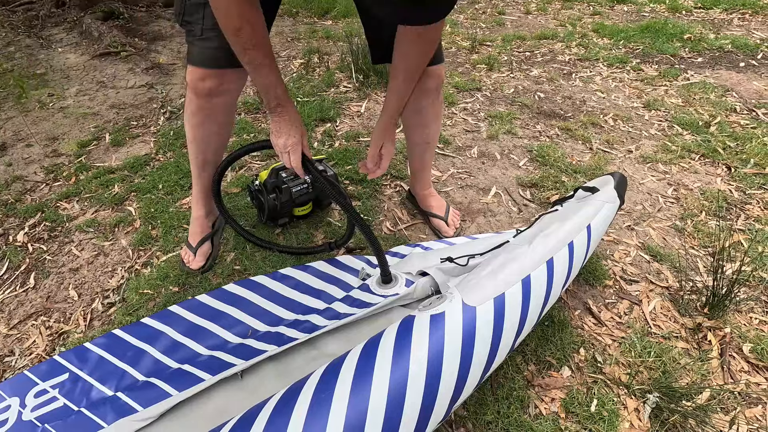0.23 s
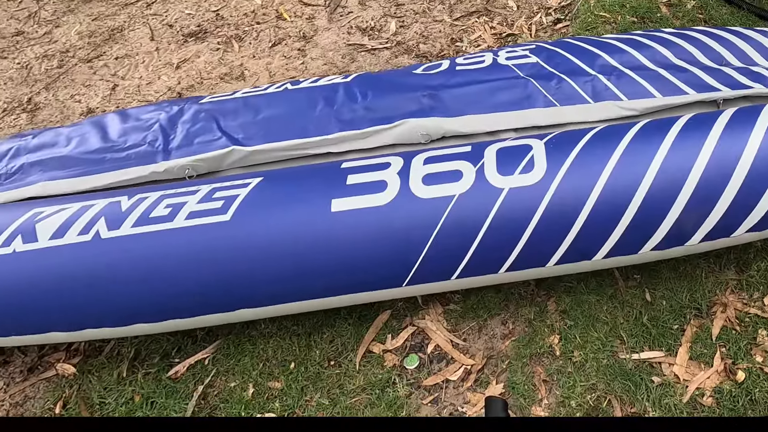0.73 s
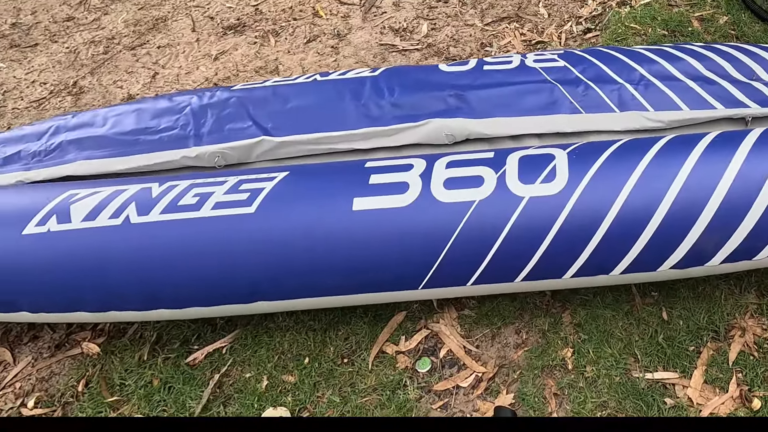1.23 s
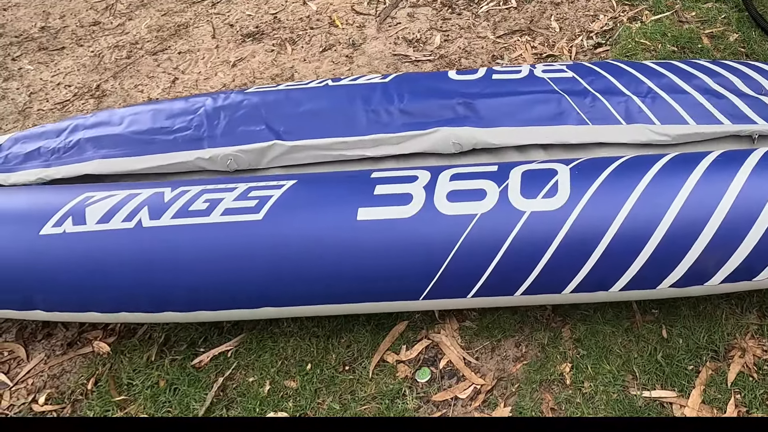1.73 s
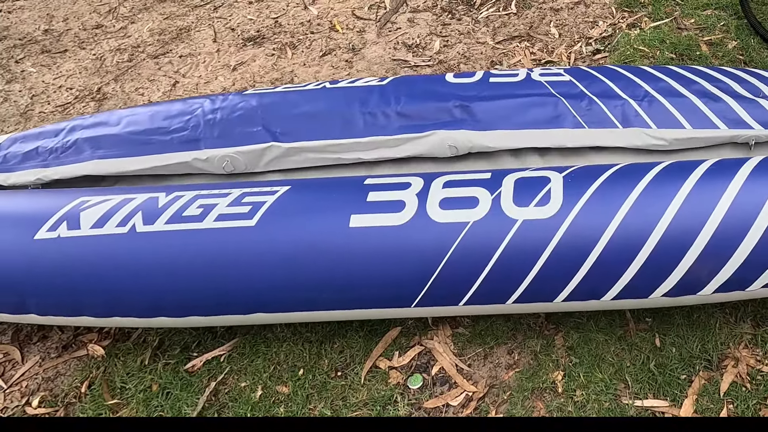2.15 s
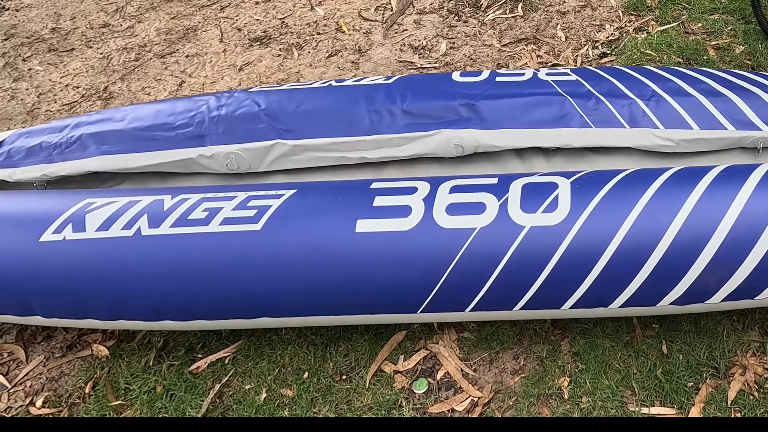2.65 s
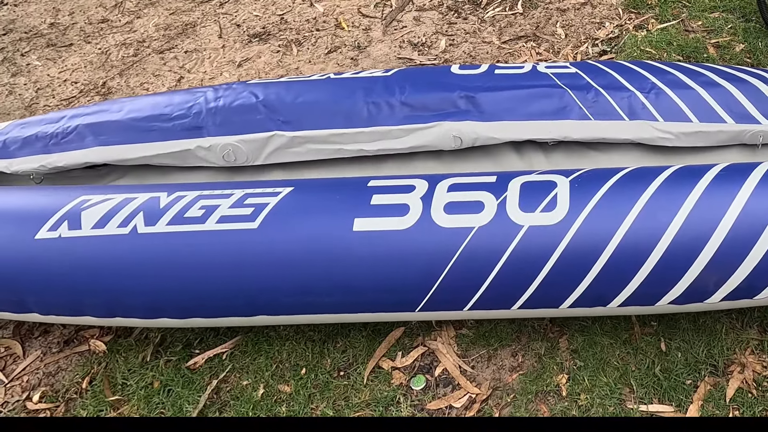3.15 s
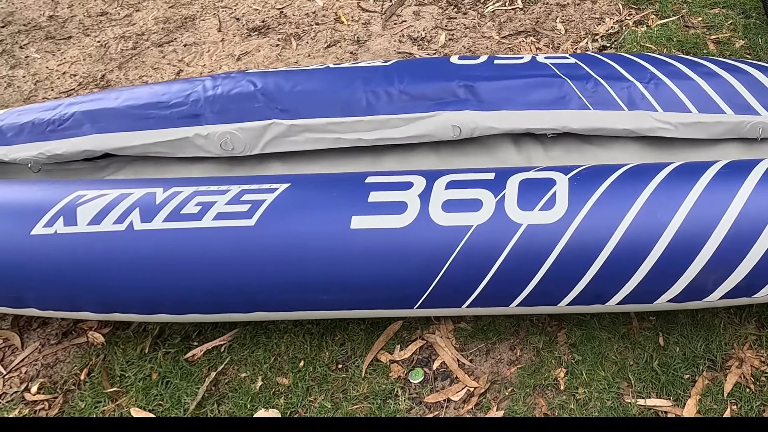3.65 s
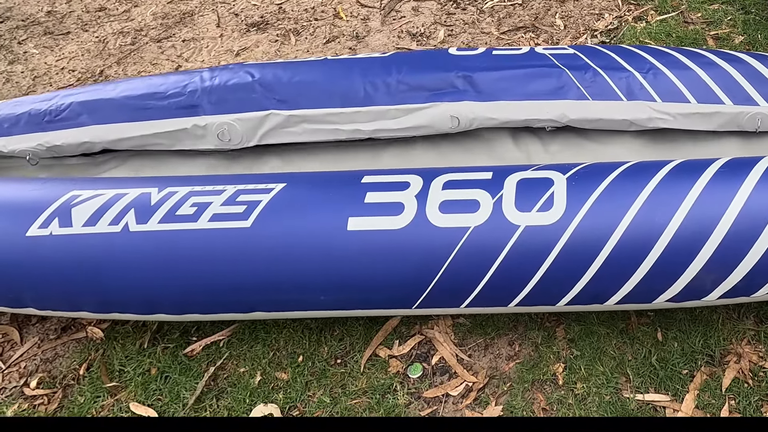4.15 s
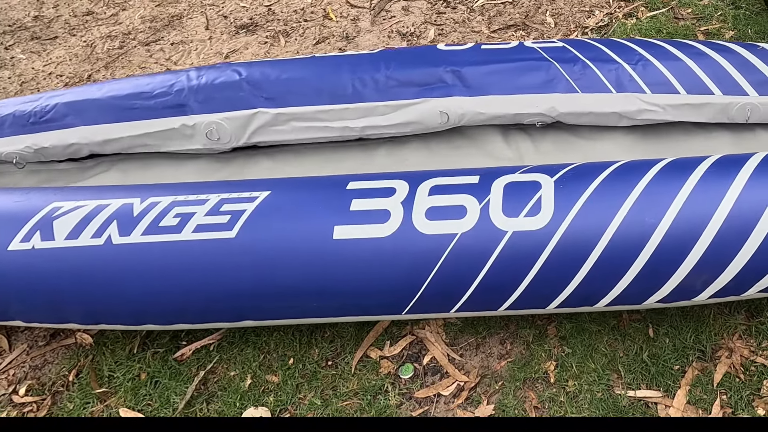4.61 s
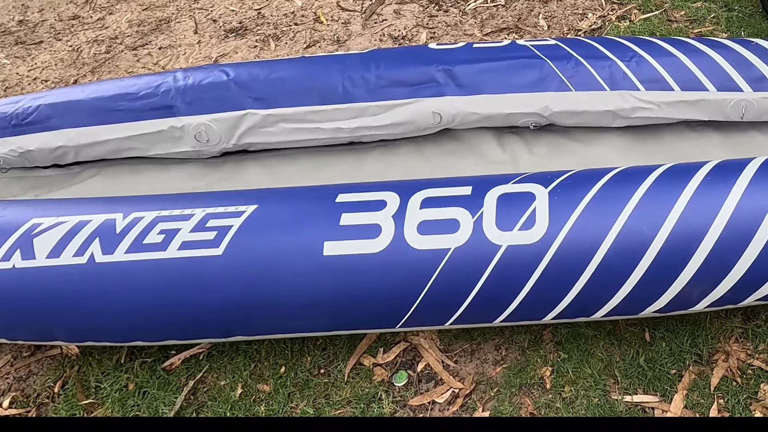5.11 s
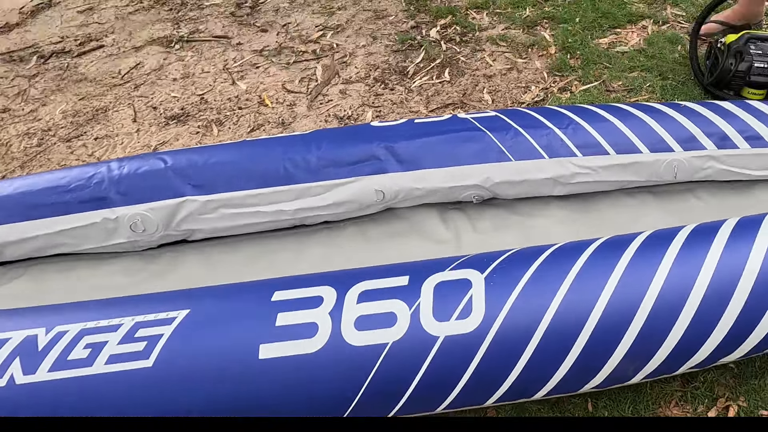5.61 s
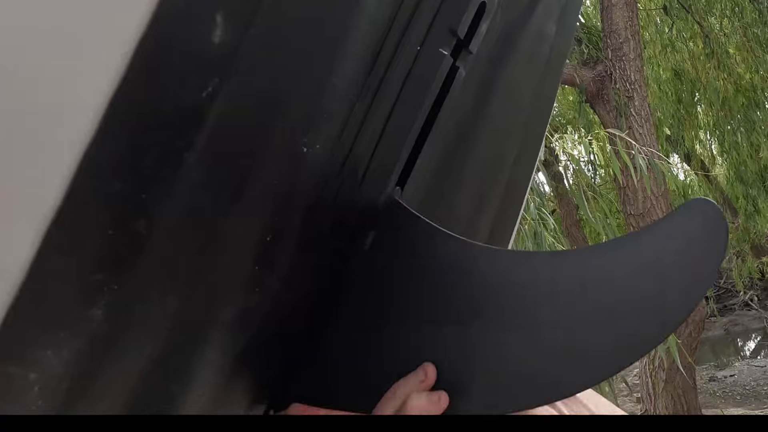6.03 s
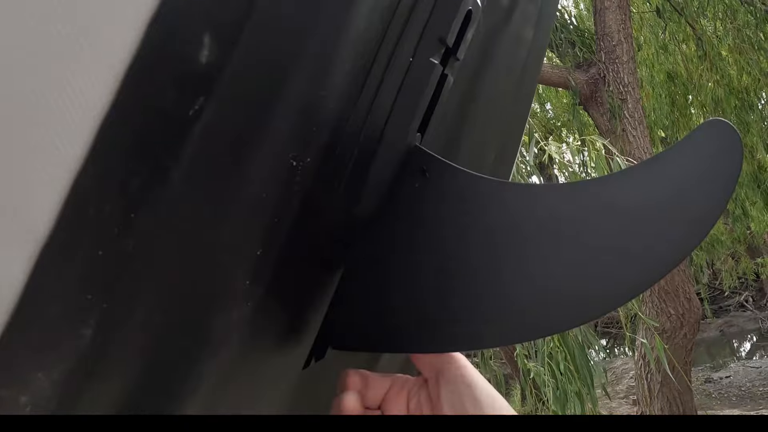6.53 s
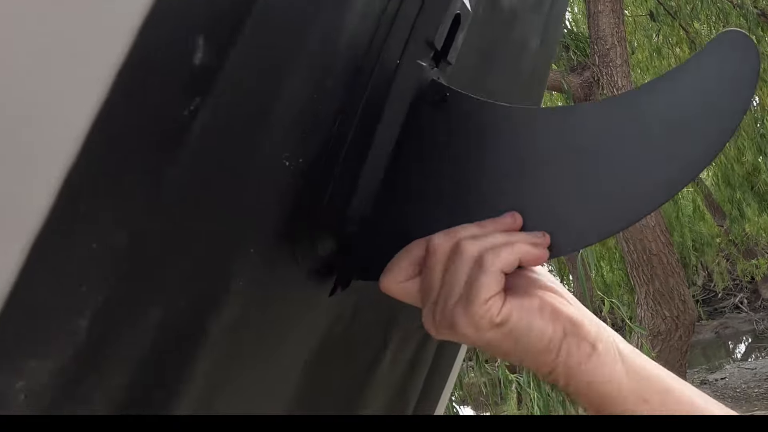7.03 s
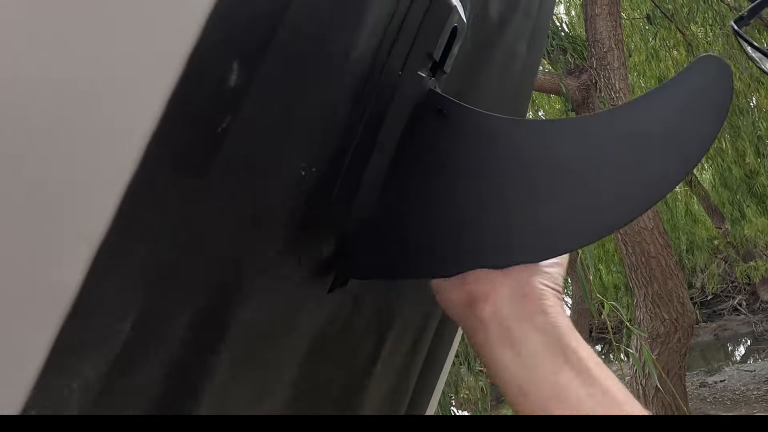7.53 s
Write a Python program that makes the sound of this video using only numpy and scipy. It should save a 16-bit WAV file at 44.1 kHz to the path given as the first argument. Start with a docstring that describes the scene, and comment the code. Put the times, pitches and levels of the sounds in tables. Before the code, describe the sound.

Close outdoor microphone: faint leafy breeze, a short complete silence, then about five seconds of a constant, loud electric inflator, its mid-low drone joined by a thin whine and blowing air, with low wind thuds. After an abrupt cut, irregular dry plastic clacks, short gritty scrapes and hand rubbing come close by, with the air-filled hull booming softly over quiet leaves and faint distant birds.

```python
"""Light wind and rustling leaves on a lawn are heard for a moment, then dead silence.
A cordless electric pump starts and stops abruptly, blowing up an inflatable boat: locked harmonics of one
loud hum, a whine at its own pitch and the filtered noise of rushing air; wind buffets the microphone.
Then a plastic fin is worked into its slot under the hull: struck modes click, stick-slip friction scrapes
and low pulses bump, while swells of low noise make the hull boom."""
import sys
import numpy as np
from scipy import signal
from scipy.fft import rfft, irfft
from scipy.io import wavfile
from scipy.ndimage import map_coordinates

SR = 44100
rng = np.random.default_rng(int(sys.argv[2]) if len(sys.argv) > 2 else 0)


def bounce(signal):
    """Save signal as a 16-bit WAV file at the path given by the first command-line argument."""
    frames = np.transpose(np.atleast_2d(signal))
    limited = np.clip(frames, -1, 1)
    pcm = np.round(limited * 32767).astype(np.int16)
    wavfile.write(sys.argv[1], SR, pcm)


N = 342585
TIME = np.arange(N) / SR
FREQS = np.maximum(np.arange(N // 2 + 1) * SR / N, 1)
LAWN_END_S, PUMP_START_S, PUMP_END_S = .257, .675, 5.696


def from_db(db):
    """Level law: decibels to amplitude gain."""
    return 10 ** (np.asarray(db) / 20)


def rms_one(x):
    """Normalisation: scale to unit mean power."""
    return x / np.sqrt(np.mean(x ** 2) + 1e-20)


def in_time(rows):
    """Linear interpolation: each column of a curve at every sample."""
    s, *columns = np.transpose(rows)
    return [np.interp(TIME, s, c) for c in columns]


def at_hz(rows, hz):
    """Logarithmic pitch scale: each column of a spectrum, interpolated on a log-frequency axis."""
    points, *columns = np.transpose(rows)
    return [np.interp(np.log(hz), np.log(points), c) for c in columns]


def drift(rate_hz):
    """Low-pass random process: slow chance variation with an rms of 1."""
    white = rfft(rng.standard_normal(N))
    return rms_one(irfft(white / (1 + (FREQS / rate_hz) ** 2), N))


def pan(balance_db):
    """Interaural level difference: left and right gains, positive towards the left."""
    return from_db(np.array([[.5], [-.5]]) * balance_db)


def between(start, end):
    """Gating: 1 from start to end in seconds, with millisecond edges."""
    return np.interp(TIME, [start - .001, start, end, end + .001], [0, 1, 1, 0])


def noise(level_db, alike, lag_ms=0):
    """Partial coherence: stereo noise of a given spectrum; a lag delays the left port."""
    alike = np.clip(alike, 0, 1)
    mid, side = rfft(rng.standard_normal((2, N)))
    pair = np.sqrt(1 + alike) * mid + np.sqrt(1 - alike) * side * np.array([[1], [-1]])
    pair[0] *= np.exp(-2j * np.pi * FREQS * lag_ms / 1000)
    return rms_one(irfft(pair * from_db(level_db) * (FREQS > 10), N))


def swells(rows, floor_db):
    """Addition of powers: a floor plus events that each grow and die away exponentially, in dB."""
    power = from_db(floor_db) ** 2
    for s, rise, fall, db in rows:
        envelope = np.exp(-np.abs(TIME - s) / np.where(TIME < s, rise, fall))
        power = power + (from_db(db) * envelope) ** 2
    return 10 * np.log10(power)


def thumps(rows):
    """Damped low swings: each is a cosine under a Gaussian envelope."""
    out = 0
    for s, db, hz, length in rows:
        envelope = np.exp(-.5 * ((TIME - s) / length) ** 2)
        out = out + from_db(db) * envelope * np.cos(2 * np.pi * hz * (TIME - s))
    return out


# Gusts on the microphone; from 6 s on, low booms of the hull stirred by the bumps.
# Each row: peak time in seconds, rise in seconds, fall in seconds, level in dB.
GUSTS_AND_BOOMS = [(.01, 0.01, 0.14, -30), (.97, 0.097, .13, -32), (1.73, 0.055, .04, -29),
                   (1.98, 0.075, 0.034, -16.5), (2.3, 0.35, .1, -22.5), (2.49, 0.018, 0.025, -17.5),
                   (2.9, 0.098, 0.072, -26.5), (4.3, .1, 0.14, -42), (4.77, 0.048, 0.073, -26.5),
                   (4.88, .03, 0.079, -25), (5.81, 0.069, 0.078, -26.5), (6.07, 0.05, 0.028, -21),
                   (6.19, 0.059, 0.058, -20), (6.34, 0.039, 0.086, -24), (6.6, 0.068, 0.13, -22.5),
                   (6.96, 0.1, 0.1, -19), (7.52, 0.013, 0.086, -26)]
# Spectrum of the low rumble. Each row: frequency in Hz, relative density in dB per Hz.
RUMBLE = [(12, -5.5), (25, 4), (55, -2.5), (90, -7.5), (160, -21.5), (260, -33), (450, -47), (1000, -79)]
# Spectrum added in strong swells (eddies in a gust). Each row: frequency in Hz, relative density in dB per Hz.
STRONG_SWELL = [(30, -3.5), (70, -1.5), (130, 2), (220, -6.5), (330, -20.5), (600, -23), (1500, -68.5)]
# Single buffets of wind, before the ports round them off.
# Each row: centre in seconds, peak in dB, frequency in Hz, Gaussian length in seconds.
BUFFETS = [(1.965, -18, 145, 0.014), (2.325, -23, 170, .006), (2.5, -25, 128, 0.0049),
           (5.27, -37, 194, 0.0073)]
# the breeze under the swells, and how much it wanders
BREEZE_DB, BREEZE_WANDER_DB = -44, 1


def wind_and_hull_boom(upper_db=-7.0, strong_db=-19.5, upper_growth=0.75):
    """Level-dependent spectrum: a lumpy rumble of wind, later of the hull; its upper part grows faster."""
    level_db = swells(GUSTS_AND_BOOMS, BREEZE_DB + BREEZE_WANDER_DB * drift(3))
    rumble = from_db(level_db) * noise(at_hz(RUMBLE, FREQS)[0], alike=0.93)
    upper_level_db = level_db + upper_db + upper_growth * (level_db - strong_db)
    upper = from_db(upper_level_db) * noise(at_hz(STRONG_SWELL, FREQS)[0], alike=1.0)
    # the ports round off the hardest swings
    return 0.31 * np.tanh((rumble + upper + thumps(BUFFETS)) / 0.24)


# Swells of rustling: leaves at the opening, then hands rubbing on hose and hull.
# Each row: peak time in seconds, rise in seconds, fall in seconds, level in dB before the flicker.
RUSTLES = [(.14, .06, 0.16, -50), (5.7, .01, 0.044, -39), (5.95, 0.065, 0.066, -40),
           (6.22, 0.13, .04, -42.5), (6.45, 0.19, 0.041, -46.5), (6.68, 0.055, 0.053, -42),
           (6.95, 0.12, .1, -47), (7.23, 0.19, 0.034, -41.5), (7.42, 0.023, .06, -47),
           (7.59, 0.084, 0.036, -38.5), (7.69, 0.017, 0.027, -37)]
# Spectrum of leaves and rubbing. Each row: frequency in Hz, relative density in dB per Hz.
LEAVES = [(150, 13), (350, 4), (650, -5), (1000, 3.5), (1450, 4.5), (2000, -0.5), (3100, -1.5), (4500, -5),
          (7500, -8.5), (8300, -15), (11000, -17.5), (15000, -43)]
LEAVES_DB = -52  # the steady rustle, before the flicker


def rustle(flicker_db=3.0):
    """Amplitude-modulated noise: a soft uneven bed of leaves, then hands rubbing swell out of it."""
    level_db = swells(RUSTLES, LEAVES_DB) + flicker_db * drift(30)
    return from_db(level_db) * noise(at_hz(LEAVES, FREQS)[0], alike=0.71)


# The pump's tones at the two microphone ports.
# Each row: frequency in Hz, left-right balance in dB, lead of the left port in radians.
PUMP_PLACE = [(377, -1.36, -.02), (1075, -5.5, -0.53), (1700, -2, -0.91), (2500, -3.5, -0.75),
              (2900, -8, -1.06), (3224, -6.5, -1.33), (5800, -5.5, -0.43), (8600, -8, 0.16),
              (11600, 4, 0.48)]


def tone(turns, hz, level_db):
    """Port level and phase difference: a sine of the given rms level, as it arrives from the pump."""
    balance_db, lead = at_hz(PUMP_PLACE, hz)
    phase = 2 * np.pi * (turns + rng.random()) + np.array([[.5], [-.5]]) * lead
    return np.sqrt(2) * from_db(level_db) * pan(balance_db) * np.sin(phase)


# the hum at switch-on, and how it sags as the boat fills
HUM_HZ, HUM_DB, SAG_DB_PER_S = 358.2, -12.5, 0.13
# slow wander and fast jitter of the motor's speed (shares of the pitch)
WANDER, JITTER = 0.000305, 0.00019
# Overtones locked to the hum. Each row: multiple of the hum, mean level in dB relative to the hum.
OVERTONES = [(2, -32.5), (3, -21), (4, -36), (5, -25.5), (6, -32), (7, -18), (8, -14.5), (9, -29.5),
             (10, -29.5), (11, -37), (12, -35), (14, -41), (15, -33), (16, -20.5), (17, -37), (18, -40),
             (19, -42), (20, -39), (21, -40.5), (22, -45), (24, -37), (25, -44), (26, -41.5), (27, -46),
             (28, -50), (29, -48), (30, -49.5), (31, -56), (32, -56), (33, -53), (34, -54), (35, -61),
             (36, -65), (37, -62), (38, -62), (39, -68), (40, -67), (41, -68)]
# Brief fades of single overtones as the microphone moves.
# Each row: middle in seconds, Gaussian half length in seconds, multiple of the hum, depth in dB.
FADES = [(0.815, 0.067, 3, -11), (1.02, 0.031, 24, -6), (1.06, 0.039, 16, -12), (4.417, .06, 16, -6),
         (4.464, 0.07, 3, -3), (4.84, 0.28, 16, -7.5), (4.985, 0.12, 3, -3)]
# the overtones swell and fade a little all the time
OVERTONE_SWELL_DB, OVERTONE_SWELLS_PER_S = 1.0, 0.5
# the whistling middle overtones sink as the boat fills
SINK_DB_PER_S, SINK_HZ, SINK_OCTAVES = 0.42, 2200, 0.32


def hum(turns, flutter_db=0.31):
    """Harmonic series: a steady fundamental with phase-locked overtones that swell and fade."""
    hum_db = HUM_DB - SAG_DB_PER_S * (TIME - PUMP_START_S)
    sink_db = SINK_DB_PER_S * (TIME - (PUMP_START_S + PUMP_END_S) / 2)
    out = tone(turns, HUM_HZ, hum_db + flutter_db * drift(25.8))
    for multiple, relative_db in OVERTONES:
        hz = multiple * HUM_HZ
        sinking = np.exp(-.5 * (np.log2(hz / SINK_HZ) / SINK_OCTAVES) ** 2)
        level_db = hum_db + relative_db - sinking * sink_db
        for s, length, which, db in FADES:
            if which == multiple:
                level_db = level_db + db * np.exp(-.5 * ((TIME - s) / length) ** 2)
        swell_db = OVERTONE_SWELL_DB * drift(OVERTONE_SWELLS_PER_S)
        out += tone(multiple * turns, hz, level_db + swell_db)
    return out


WHINE_HZ = 1702.3
# Level curve of the whine. Each row: time in seconds, rms level in dB.
WHINE = [(.7, -28.5), (1.2, -23.5), (2.8, -26.5), (3.5, -29.5), (4.15, -43), (4.45, -35), (4.95, -33),
         (5.67, -22.5)]
# Faint tones beside the whine. Each row: frequency in Hz, rms level in dB before the waver.
SIDE_TONES = [(871, -54), (920, -49.5), (2060.5, -48.5), (3404.6, -50)]


def whine(waver_db=4.0):
    """Inharmonic partials: a whine at a pitch of its own, with faint wavering tones beside it."""
    out = tone(WHINE_HZ * TIME, WHINE_HZ, in_time(WHINE)[0])
    for side_hz, level_db in SIDE_TONES:
        side_turns = side_hz * TIME + 0.018 * drift(8)
        out += tone(side_turns, side_hz, level_db + waver_db * drift(2.8))
    return out


# Spectrum of the rushing air. Each row: frequency in Hz, relative density in dB per Hz.
AIR = [(40, -19), (250, -3), (500, -2.5), (780, -7), (1000, 0.5), (1800, -6), (3500, -0.5), (5000, -4.5),
       (6500, -8), (7800, -12), (8100, -16), (10500, -20), (13000, -35.5), (15200, -51)]
# Resonances of hose and housing. Each row: centre in Hz, width in Hz, boost in dB.
HOSE = [(1090, 94, 3), (1520, 220, 6.5), (2020, 150, 8.5), (2440, 150, 2.5), (2972, 207, 10.5),
        (4300, 460, 2.5)]
AIR_DB = -28.5  # before chopping and echo
GROUND_ECHO_MS = 1.246  # extra path of the echo off the ground


def rushing_air(turns, chop=0.081, echo_db=-19):
    """Turbulence and resonance: coloured noise, chopped at the hum's rate, combed by the ground echo."""
    colour_db = at_hz(AIR, FREQS)[0]
    for hz, width, db in HOSE:
        colour_db = colour_db + db / (1 + (2 * (FREQS - hz) / width) ** 2)
    direct = noise(colour_db, alike=0.94, lag_ms=0.016)
    earlier = np.arange(N) - GROUND_ECHO_MS * SR / 1000
    echo = np.array([map_coordinates(side, [earlier]) for side in direct])
    chopping = 1 + chop * np.cos(2 * np.pi * turns)
    return from_db(AIR_DB) * chopping * pan(-2.0) * (direct + from_db(echo_db) * echo)


def pump():
    """Superposition: hum, whine and air, the hum and the chopping of the air sharing one rotation."""
    speed = 1 + WANDER * drift(0.91) + JITTER * drift(23)
    turns = np.cumsum(HUM_HZ * speed) / SR
    return hum(turns) + whine() + rushing_air(turns)


# Far bird calls. Each row: start in seconds, length in seconds, start and end pitch in Hz, level in dB.
BIRDS = [(6.8, .07, 2900, 2750, -56), (7.28, .045, 4300, 3300, -62)]


def distance(drone_hz=156.5, drone_db=-53):
    """Frequency modulation: a faint wavering drone and gliding, fluttering bird calls, all far away."""
    drone_turns = drone_hz * TIME + 0.095 * drift(2.7)
    out = np.sqrt(2) * from_db(drone_db + 2 * drift(4)) * np.sin(2 * np.pi * drone_turns)
    for s, length, start_hz, end_hz, db in BIRDS:
        along = np.clip((TIME - s) / length, 0, 1)
        pitch_hz = (start_hz + (end_hz - start_hz) * along) * (1 + .05 * drift(200))
        call = np.sin(np.pi * along) * np.sin(2 * np.pi * np.cumsum(pitch_hz) / SR)
        out += np.sqrt(2) * from_db(db) * call
    return out


# Contacts of the fin in its slot. Each row: time in seconds, rms level of the attack in dB,
# contact sharpness as a treble cutoff in Hz, bite of the slot in dB.
CLICKS = [(5.8064, -16, 4900, -7), (5.8157, -26.5, 2700, 5), (5.9426, -19.5, 3900, -8),
          (6.0283, -28, 3500, 0), (6.0333, -21, 1580, -6), (6.1202, -19, 3300, -11),
          (6.1414, -21, 3200, -7), (6.187, -22, 4350, 6), (6.2128, -25, 3300, 7), (6.313, -14, 2380, 6.5),
          (6.371, -21.5, 2850, -12), (6.425, -32, 2900, -11), (6.4658, -11, 2580, 13),
          (6.544, -17, 4470, -3), (6.6586, -10, 5460, 2), (6.6662, -11, 3920, 4),
          (6.8696, -14.5, 6200, -20), (6.896, -27, 2500, -3), (6.8996, -16, 5200, -15),
          (6.9111, -17, 4340, -13), (6.9251, -14.5, 4500, -9), (7.0429, -22.5, 4600, 0),
          (7.2007, -9.5, 2600, 10), (7.2168, -11.5, 4430, -5), (7.4124, -17, 5670, -3),
          (7.4449, -19, 2500, 12), (7.4503, -19.5, 5000, -1), (7.458, -21, 2100, 10),
          (7.4952, -22, 2500, 8), (7.5709, -12, 2900, 6), (7.6224, -18, 1910, 13), (7.6751, -19, 3730, 2),
          (7.6785, -19.5, 2300, 8), (7.7006, -25, 2800, 0), (7.703, -20, 4800, 2), (7.729, -31.5, 1700, 12)]
# Modes of fin and slot. Each row: frequency in Hz, relative level in dB, 60 dB decay time in seconds.
FIN = [(578, -15, 0.025), (1034, -13.5, 0.022), (1350, -1.5, 0.0037), (1875, -10, 0.0067),
       (2340, -20, 0.015), (2850, -21, 0.013), (3310, -21.5, 0.022), (4600, -15, 0.011), (5380, -8, 0.0077),
       (6630, -7.5, 0.0056), (9700, -8, 0.0043)]
# the slot's resonance, strong or weak according to where the fin touches
BITE_HZ, BITE_Q = 3300, 2.4


def fin_clicks(low_cut_hz=800, tail_db=-41, tail_t60=0.061, echo_db=-15, spread_hz=4500, size=3000):
    """Impact excitation of modes: a dry crack, a short ring, two near reflections and a faint scatter."""
    out, t = np.zeros((2, N + size)), np.arange(size) / SR
    low_cut = signal.butter(3, low_cut_hz, "high", fs=SR, output="sos")
    _, bending = signal.butter(2, spread_hz, fs=SR)
    slot = signal.iirpeak(BITE_HZ, BITE_Q, fs=SR)
    for s, level_db, contact_hz, bite_db in CLICKS:
        click = 1. * (t == 0)
        for hz, db, t60 in FIN:
            strength_db, detune = rng.normal(0, 2.5), rng.normal(1, .025)
            decay = from_db(db + strength_db - 60 * t / t60)
            click += .5 * decay * np.cos(2 * np.pi * hz * detune * t)
        delays = (rng.uniform(.0006, .0028, 2) * SR).astype(int)
        click = click + from_db(echo_db) * sum(np.roll(click, delay) for delay in delays)
        # scatter from hull and ground
        click = click + from_db(tail_db - 60 * t / tail_t60) * rng.standard_normal((2, size))
        click = click + (from_db(bite_db) - 1) * signal.lfilter(*slot, click)
        # a softer contact lasts longer and loses its treble
        contact = signal.butter(3, contact_hz, fs=SR, output="sos")
        click = signal.sosfilt(contact, signal.sosfilt(low_cut, click))
        # all-pass: bending waves travel at different speeds and smear the crack a little
        click = signal.lfilter(bending[::-1], bending, -click)
        attack_rms = np.sqrt(np.mean(click[:, t < .0022] ** 2))
        for channel in range(2):  # the left port hears it one sample later
            at = round(s * SR) + 1 - channel
            out[channel, at:at + size] += from_db(level_db) * click[channel] / attack_rms
    return out[:, :N] * pan(-0.9)


# Strokes of the sliding fin. Each row: peak time in seconds, rise in seconds, fall in seconds,
# hiss level in dB, nominal level of the hull's groan in dB.
SLIDES = [(5.893, 0.014, 0.017, -36, -44), (5.942, 0.017, 0.01, -34.5, -35.5),
          (6.022, 0.014, 0.011, -39, -37), (6.034, 0.0031, 0.0074, -46, -27),
          (6.187, 0.018, 0.014, -27, -22), (6.435, 0.0079, 0.0073, -43, -43),
          (6.5, 0.0045, 0.0042, -46, -43), (6.625, 0.022, 0.013, -46, -44),
          (6.667, 0.0086, 0.0071, -40, -32.5), (6.936, 0.019, 0.0086, -21.5, -20),
          (6.96, 0.013, 0.021, -68, -35), (7.203, 0.0097, 0.015, -66, -38.5),
          (7.495, 0.0094, 0.011, -43, -38), (7.518, 0.013, .008, -59, -33), (7.688, 0.018, .015, -53, -43),
          (7.745, 0.0071, 0.0058, -41, -45)]
# Spectrum of the plastic hiss. Each row: frequency in Hz, relative density in dB per Hz.
HISS = [(300, 0), (1200, -50), (2200, -11), (3500, 2.5), (5800, -1), (7500, -3.5), (8400, -8),
        (10500, -6.5), (13000, -18), (15500, -32)]
# Spectrum of the hull's groan. Each row: frequency in Hz, relative density in dB per Hz.
GROAN = [(100, 13.5), (330, -3), (520, 1.5), (1000, 5.5), (1500, -2), (2300, -9.5), (4000, -7), (9000, -57)]


def fin_slides(grain_db=2.5, slips_per_s=260, slip_db=-3, hull_hz=235, hull_t60=0.036, hull_db=-20,
               size=1500):
    """Stick-slip friction: a grainy hiss; pressed hard, the fin judders and sets itself and hull ringing."""
    hiss_gain, groan_gain, t = np.zeros(N), np.zeros(N), np.arange(size) / SR
    for s, rise, fall, hiss_db, groan_db in SLIDES:
        stroke = np.exp(-.5 * ((TIME - s) / np.where(TIME < s, rise, fall)) ** 2)
        hiss_gain += from_db(hiss_db) * stroke
        groan_gain += from_db(groan_db) * stroke
    slips = (rng.random(N) < slips_per_s / SR) * rng.uniform(0.38, 1, N)
    ring = np.zeros(size)
    for hz, db, t60 in [*FIN, (hull_hz, hull_db, hull_t60)]:
        ring += from_db(db - 60 * t / t60) * np.sin(2 * np.pi * hz * t) / hz
    judder = from_db(slip_db) * rms_one(signal.fftconvolve(slips, ring)[:N])
    rub = from_db(0.5) * noise(at_hz(GROAN, FREQS)[0], alike=0.97)
    grain = rms_one(from_db(grain_db * drift(500)))
    hiss = grain * pan(1.0) * noise(at_hz(HISS, FREQS)[0], alike=.85, lag_ms=0.0053)
    return hiss_gain * hiss + groan_gain * (grain * rub + judder)


# Soft bumps of the hull.
# Each row: centre in seconds, peak in dB before panning, frequency in Hz, Gaussian length in seconds.
BUMPS = [(6.057, -15, 44, 0.012), (6.197, -12, 51.7, 0.012), (6.34, -12.5, 51.6, 0.0073),
         (6.59, -27.5, 283, 0.0028), (6.596, -11, 66, 0.0042), (6.929, -17, 323, 0.0091),
         (6.958, -3.5, 42.7, 0.0075), (7.005, -15, 29.7, 0.022), (7.516, -11.5, 30, 0.0085)]


def hull_bumps():
    """Compliance of enclosed air: the air-filled hull swings briefly at low pitch when pushed."""
    return pan(-1.0) * thumps(BUMPS)


def scene():
    """Superposition of sources: lawn, silence, pump, then fin."""
    lawn = between(0, LAWN_END_S)
    pumping = between(PUMP_START_S, PUMP_END_S)
    fitting = between(PUMP_END_S, N / SR)
    low_gain = pan(-1.1) * lawn + pan(-4.0) * pumping + from_db(-2.5) * pan(-1.2) * fitting
    low_rumble = wind_and_hull_boom() * low_gain
    background = low_rumble + (lawn + fitting) * rustle() + (pumping + fitting) * distance()
    return background + pumping * pump() + fin_clicks() + fin_slides() + hull_bumps()


CUTOFF_HZ = 15800


def record(dry):
    """Clipping and band limiting: peaks stop at full scale, then a steep low-pass cuts the top."""
    low_pass = signal.ellip(10, .1, 80, CUTOFF_HZ, fs=SR, output="sos")
    return signal.sosfilt(low_pass, np.clip(dry, -1, 1))


dry = scene()
out = record(dry)
bounce(out)
```